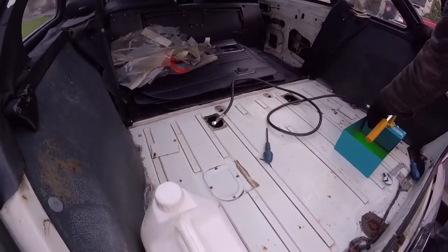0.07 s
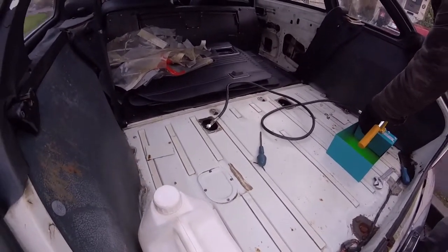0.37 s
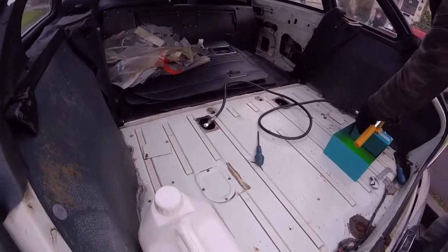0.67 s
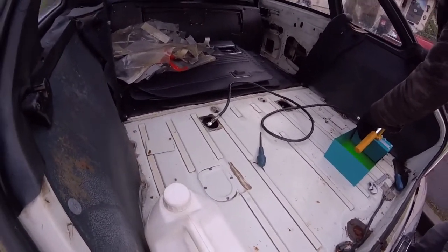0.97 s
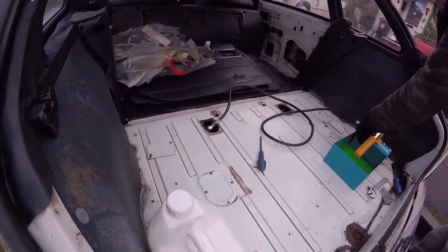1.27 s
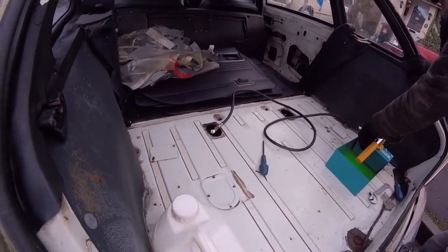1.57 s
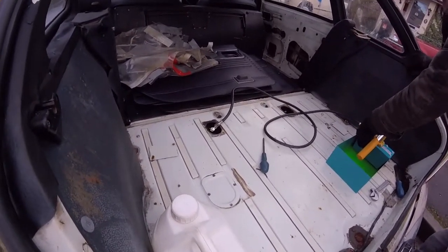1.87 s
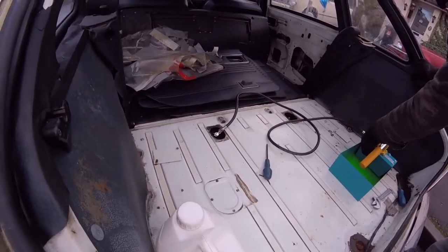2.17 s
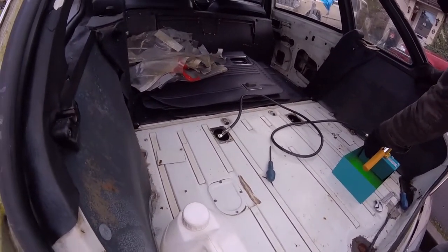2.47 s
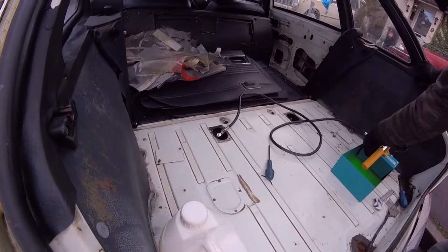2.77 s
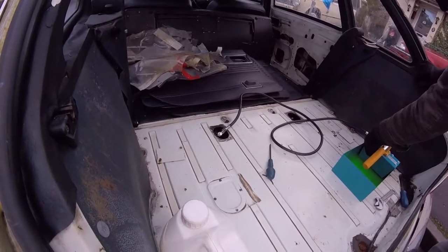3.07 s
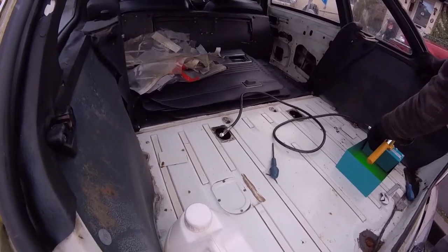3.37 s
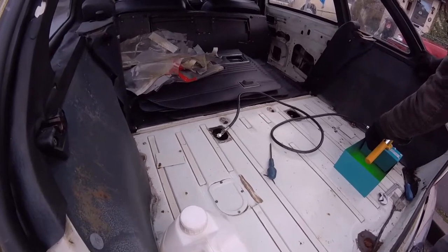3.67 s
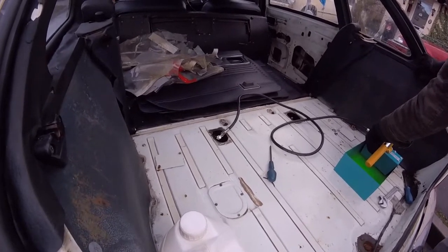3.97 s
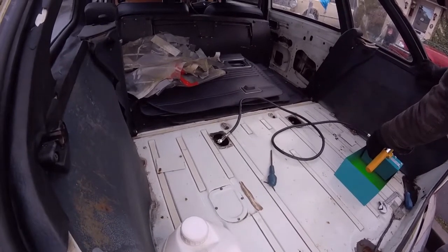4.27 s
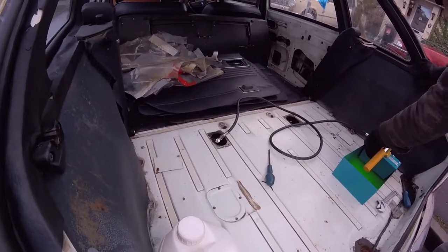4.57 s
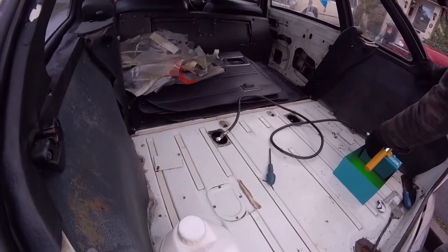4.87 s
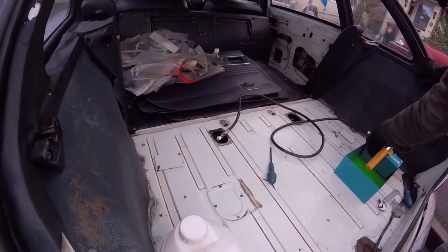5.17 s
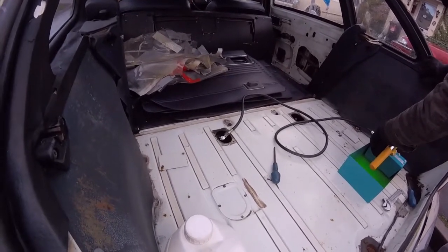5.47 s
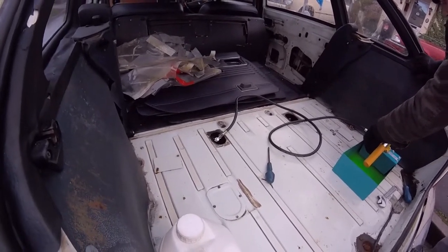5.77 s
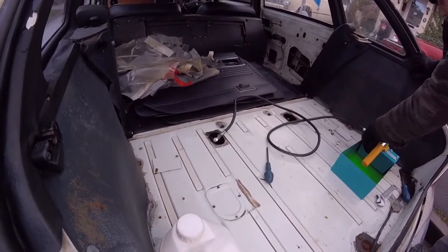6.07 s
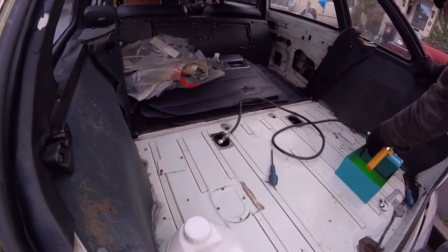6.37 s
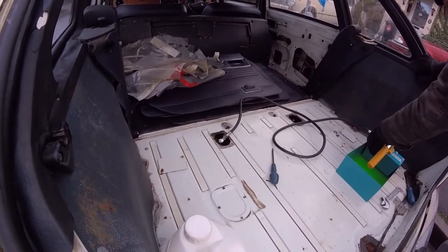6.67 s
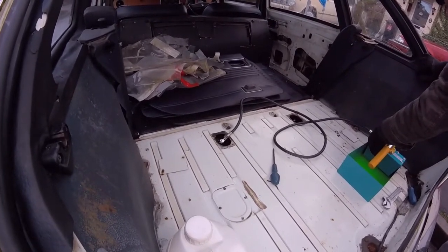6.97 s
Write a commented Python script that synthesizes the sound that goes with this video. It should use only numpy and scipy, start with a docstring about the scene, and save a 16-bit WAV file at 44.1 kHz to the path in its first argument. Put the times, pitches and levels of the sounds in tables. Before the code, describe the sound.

A hand pump knocks on a car's steel boot floor and hisses out sputtering spray, then the body thumps, amid birds, traffic and breeze.

```python
"""At a car's open boot, one microphone; distant traffic, small birds and a rumbling breeze throughout.
At 0.4 s a hand pump knocks on the bare steel floor, its valve opens and a jet of spray hisses out.
As the pressure falls the jet breaks into spurts, then last sputters, and runs dry at about 2 s.
From 3.5 s a finch trills across the yard; at 4.1 s the car's body thumps once and its panels boom.
The birds chirp and churr on to the end, between gusts on the microphone."""
import sys
import numpy as np
from scipy import signal
from scipy.fft import rfft, irfft
from scipy.io import wavfile
from scipy.ndimage import uniform_filter1d

SR = 44100
rng = np.random.default_rng(int(sys.argv[2]) if len(sys.argv) > 2 else 0)


def log_audio(samples):
    """Write samples as a 16-bit WAV file to the path given in sys.argv[1]."""
    # one column per channel
    frames = np.atleast_2d(samples).T
    # limit to full scale, then quantise
    limited = np.clip(frames, -1, 1)
    pcm = np.round(limited * 32767).astype(np.int16)
    wavfile.write(sys.argv[1], SR, pcm)


N = 309749

# Levels in the tables are relative: each source is scaled further on its way to the microphone.
# spectrum of distant traffic: frequency_hz, density_db
TRAFFIC_COLOUR = [(50, -3.5), (90, 11), (130, 3.5), (250, -0.5), (450, -5.5), (650, -1), (900, 2.5),
                  (1100, 1), (1450, -5), (1850, -19.5), (2400, -23), (3600, -25.5), (6500, -34),
                  (12500, -45), (14500, -69)]
# spectrum of the breeze on the microphone: frequency_hz, density_db
BREEZE_COLOUR = [(8, -0.5), (25, 3.5), (45, -3), (90, -12.5), (150, -22), (250, -40.5), (500, -48),
                 (1500, -101)]
# gusts on the microphone: peak_s, half_length_s, level_db
GUSTS = [(0.105, 0.041, -32.5), (0.3, 0.13, -29.5), (0.58, 0.11, -33.5), (1.287, 0.053, -32.5),
         (2.195, 0.16, -44), (3.11, 0.081, -35.5), (3.27, 0.11, -42), (3.797, 0.25, -40),
         (4.527, 0.12, -34), (4.916, 0.042, -34), (5.325, 0.12, -37), (6.607, 0.049, -30),
         (6.814, 0.086, -35.5)]

# warbles of far birds: start_s, length_s, pitch_hz, wander_share, level_db
FAR_WARBLES = [(2.139, 0.18, 4110, 0.13, -64), (2.77, 0.14, 3560, 0.055, -64.5),
               (3.138, 0.04, 3350, 0.046, -60.5), (3.44, 0.06, 3340, 0.045, -62),
               (5.038, 0.091, 4190, 0.09, -64.5), (5.447, 0.59, 3910, 0.1, -68)]
# birds' dry churrs: start_s, length_s, sweeps_per_s, final_db
CHURRS = [(2.446, 0.07, 66, -56), (3.141, 0.25, 66, -53), (5.259, 0.054, 81, -50), (6.833, 0.072, 80, -50),
          (6.972, 0.044, 78, -48.5)]
# near birds' chirps, two followed by a quick echo:
# start_s, length_s, start_hz, middle_hz, end_hz, level_db
NEAR_CHIRPS = [(0.002, 0.022, 4000, 4630, 5150, -50.5), (0.333, 0.027, 5880, 6000, 5980, -54),
               (0.738, 0.059, 4300, 3880, 3750, -55.5), (1.11, 0.03, 4930, 5200, 5350, -56.5),
               (1.814, 0.024, 3900, 4280, 3950, -53), (1.843, 0.014, 3850, 4260, 4100, -52),
               (1.866, 0.022, 3380, 3750, 4000, -55.5), (1.884, 0.021, 3500, 3220, 3180, -56.5),
               (2.026, 0.013, 3600, 4100, 4500, -61), (2.114, 0.11, 3050, 3080, 2850, -60),
               (2.137, 0.04, 4300, 5020, 4730, -66), (2.181, 0.016, 4620, 4110, 3950, -53),
               (2.186, 0.012, 3400, 2950, 2700, -53.5), (2.187, 0.042, 6400, 6440, 6630, -67.5),
               (2.211, 0.022, 3570, 4030, 4630, -64), (2.231, 0.01, 4500, 3880, 3550, -60),
               (2.242, 0.026, 3700, 4770, 5050, -63), (2.937, 0.03, 4170, 5330, 5640, -56.5),
               (3.053, 0.033, 3450, 3980, 4380, -59), (3.102, 0.012, 4220, 3930, 3920, -55),
               (3.397, 0.023, 4170, 3940, 3950, -57.5), (4.274, 0.013, 4270, 5130, 5800, -57),
               (4.539, 0.02, 4770, 5290, 5600, -51.5), (4.638, 0.022, 4100, 4400, 4760, -54),
               (4.922, 0.042, 5550, 5920, 5690, -54.5), (5.036, 0.012, 3900, 4600, 5000, -55.5),
               (5.346, 0.027, 3700, 4500, 5100, -50.5), (5.37, 0.023, 3750, 4540, 5000, -52.5),
               (5.471, 0.027, 3360, 3790, 4080, -51.5), (5.522, 0.019, 5200, 5760, 5900, -58.5),
               (5.522, 0.02, 6000, 6750, 7050, -61), (5.566, 0.0226, 3800, 4620, 5100, -48),
               (5.592, 0.024, 3830, 4450, 4800, -56), (5.712, 0.025, 3300, 3680, 4050, -50.5),
               (5.758, 0.022, 5200, 5630, 5800, -60), (5.845, 0.062, 4950, 4810, 4620, -51),
               (5.898, 0.03, 4500, 3930, 3360, -61), (5.925, 0.013, 3430, 4160, 4900, -55),
               (5.965, 0.058, 3460, 4030, 4940, -51), (6.077, 0.014, 5730, 6500, 6950, -65),
               (6.104, 0.028, 6150, 6480, 6460, -56.5), (6.168, 0.012, 3200, 3730, 4050, -52),
               (6.217, 0.0081, 4800, 5400, 6000, -63), (6.251, 0.14, 4020, 3610, 3657, -54),
               (6.592, 0.018, 3850, 4100, 4300, -59), (6.633, 0.0224, 4750, 5400, 5800, -51.5),
               (6.732, 0.026, 3970, 4520, 4780, -55)]
# a finch's syllable, four glides and then a short low echo of the last:
# offset_s, length_s, start_hz, end_hz, bend_exponent, level_db
FINCH_SYLLABLE = [(0.0, 0.018, 8800, 7350, 1.2, -15.5), (0.025, 0.029, 7100, 5900, 1.5, -7.5),
                  (0.053, 0.015, 4540, 5154, 0.88, -0.5), (0.067, 0.019, 6500, 3400, 4.5, 0),
                  (0.087, 0.014, 4010, 3170, 1.25, -1)]
# path of the finch's closing slur: time_s, pitch_hz, level_db
SLUR_PATH = [(4.286, 5020, -50), (4.32, 4160, -51), (4.36, 3690, -56.5), (4.405, 3530, -53.5),
             (4.43, 3500, -60)]
# echoes off nearby walls: delay_s, level_db
WALL_ECHOES = [(0.008, -11.5), (0.019, -14), (0.042, -13.5), (0.061, -21)]

# the body's thump and its soft settlings: start_s, ring_db, boom_db, cutoff_hz
THUMPS = [(4.131, -25, -20.5, 3600), (4.16, -37, -36, 400), (4.259, -41, -29.5, 252), (5.28, -43, -50, 200)]
# modes of the car's large panels: pitch_hz, level_db, t60_s
BODY_MODES = [(42.6, 0.5, 0.79), (70.8, -11, 0.47), (107.8, -3, 0.38), (149.3, 3, 0.45), (282.2, -7, 0.47),
              (470, -34, 0.47)]
# dense boom of those panels: frequency_hz, density_db, t60_s
BODY_BOOM = [(25, 9, 0.84), (131, -2.5, 1.77), (282, -8, 0.62), (420, -18.5, 0.34), (756, -25, 0.044),
             (1290, -4.5, 0.036), (1830, -24, 0.071), (3600, -30.5, 0.044), (6000, -36, .03),
             (14000, -50, .03)]

# the pump's base scuffing under the hand: start_s, hold_s, level_db
SCUFFS = [(0.365, 0.01, -42), (0.514, 0.03, -42), (1.03, 0.22, -54), (1.718, 0.045, -45),
          (3.097, 0.67, -57)]
# rustle of the floor pan: frequency_hz, density_db
SCUFF_COLOUR = [(120, -22), (250, -11), (320, 9.5), (400, 3.5), (490, -15), (750, -7), (1200, -7),
                (1500, -9), (2000, -43), (6000, -80)]
# soft bumps of the opening valve: start_s, level_db
VALVE_BUMPS = [(0.491, -25.5), (0.546, -33)]
# modes of the pump's housing: pitch_hz, level_db, t60_s
HOUSING_MODES = [(171, -5, 0.12), (344, -1, 0.084), (388, -5, 0.14), (697, -7.5, 0.08), (835, -12, 0.08)]
# knocks of the pump on the floor: start_s, ring_db, clatter_db, cutoff_hz
KNOCKS = [(0.356, -36, -25.5, 1300), (0.368, -23.5, -29.5, 6000), (0.379, -36.5, -26, 2000),
          (0.405, -43, -35, 350), (0.42, -41, -35, 199), (1.745, -51, -50, 1500), (1.777, -61, -47, 2500)]
# modes of the steel floor: pitch_hz, level_db, t60_s
FLOOR_MODES = [(88.7, -7.5, 0.33), (183, -4, 0.22), (278.6, 0.5, 0.12), (342, -0.5, 0.068),
               (399.5, -5, 0.16), (645, -4.5, 0.11), (813, -12, 0.1), (1146, -6, 0.17), (1390, -18, 0.16),
               (1462, -10, 0.1)]
# dense rattle of that floor: frequency_hz, density_db, t60_s
FLOOR_CLATTER = [(30, 17, 0.068), (120, 3.5, 0.13), (336, -7.5, 0.21), (520, -13, 0.14), (1200, -7.5, 0.1),
                 (1600, -20, 0.11), (1970, -36, 0.095), (2600, -17, 0.047), (5000, -40, .06),
                 (14000, -40, .05)]

# hiss of the unbroken jet: frequency_hz, density_db
JET_COLOUR = [(900, -26), (1800, -6), (2400, -3), (3400, 4), (4200, -0.5), (5000, -2.5), (6400, -4),
              (8100, -2.5), (9500, -6.5), (12500, -10.5), (14500, -6.5)]
# ringing of the nozzle in the jet: centre_hz, width_hz, lift_db
NOZZLE_RESONANCES = [(2120, 80, 10), (2390, 100, 4), (2820, 160, 10), (3420, 380, 8), (6370, 220, 6),
                     (7900, 200, 4), (8500, 120, 5)]
# runs of valve chatter as the pressure falls: start_s, length_s, spurts_per_s, level_db
CHATTER_RUNS = [(0.704, 0.055, 31, -56), (0.777, 0.07, 33, -53), (0.877, 0.1, 36, -52.5),
                (0.989, 0.03, 57, -54), (1.032, 0.14, 39, -55), (1.19, 0.1, 36, -56.5)]
# last sputters, singing in the nozzle at low pressure: start_s, hiss_db, lisp_db
SPUTTERS = [(1.311, -57.5, -72), (1.345, -58, -70), (1.383, -55.5, -66), (1.43, -59, -58), (1.47, -61, -61),
            (1.53, -57.5, -57), (1.576, -61, -51), (1.615, -55, -70), (1.65, -57.5, -63),
            (1.69, -58.5, -77), (1.746, -61, -72), (1.773, -62, -64), (1.822, -66, -67), (1.869, -62, -58),
            (1.931, -63, -72)]
# hiss of the spurts: frequency_hz, density_db
SPURT_COLOUR = [(1500, -6), (2500, -3), (3250, 3.5), (4200, -2), (6200, -3), (7300, -2.5), (7950, 2.5),
                (9000, -5), (10400, -3.5), (11200, -1), (12300, -10), (14600, -10.5)]
# the nozzle's lisp: frequency_hz, density_db
LISP_COLOUR = [(4500, -11), (5900, -5), (6600, 2), (7400, -9), (8500, -12), (10000, -40)]


def amp(db):
    """Decibels to gain."""
    return 10 ** (np.asarray(db) / 20)


def unit(x):
    """Scales to rms 1."""
    return x / np.sqrt(np.mean(x ** 2) + 1e-20)


def drift(samples, span):
    """Random wobble of rms 1, smoothed over span samples."""
    return unit(uniform_filter1d(rng.standard_normal(samples), span))


def over_hz(table, hz, column=1):
    """Reads a column of a table on a log-frequency axis, one row a frequency."""
    columns = np.transpose(table)
    return np.interp(np.log(hz + 1), np.log(columns[0] + 1), columns[column])[:, None]


def add(mix, start_s, sound):
    """Mixes a sound in at start_s."""
    part = mix[max(round(start_s * SR), 0):][:len(sound)]
    part += sound[:len(part)]


def envelope(start_s, rise_s, hold_s, fall_db_per_s):
    """Gain over the whole scene: a straight rise, a hold, then a steady fall in dB."""
    age = np.arange(N) / SR - start_s
    return np.clip(age / rise_s, 0, 1) * amp(-fall_db_per_s * np.maximum(age - rise_s - hold_s, 0))


def noise(colour, patchy_db):
    """Noise of a given spectrum whose level drifts in small patches of time and frequency."""
    hz = np.fft.rfftfreq(2048, 1 / SR)
    real, imag, patches = rng.standard_normal((N // 512 + 5, len(hz), 3)).T
    patches = unit(uniform_filter1d(uniform_filter1d(patches, 14, axis=0), 8, axis=1))
    spectrum = (real + 1j * imag) * amp(over_hz(colour, hz) + patchy_db * patches)
    return unit(signal.istft(spectrum, nperseg=2048, noverlap=1536)[1][:N])


def reflect(dry, delay_s, t60_s, wet_db, count):
    """Adds scattered reflections that die away after a first delay."""
    t = np.arange(SR // 2) / SR
    taps = np.zeros(len(t))
    arrivals = ((np.arange(count) + rng.random(count)) * len(t) / count).astype(int)
    taps[arrivals] = rng.choice([-1, 1], count) * amp(-60 * t[arrivals] / t60_s)
    out = dry.copy()
    add(out, delay_s, amp(wet_db) * signal.fftconvolve(dry, taps / np.linalg.norm(taps)))
    return out


def traffic(level_db=-42.5):
    """Steady tyre roar from far roads."""
    return amp(level_db) * noise(TRAFFIC_COLOUR, patchy_db=0.91)


def breeze(calm_db=-44.5):
    """Wind rumbles on the microphone; each gust adds its power to the calm."""
    t = np.arange(N) / SR
    gust_power = sum(amp(db) ** 2 * np.exp(-((t - peak_s) / half_s) ** 2) for peak_s, half_s, db in GUSTS)
    return np.sqrt(amp(calm_db) ** 2 + gust_power) * noise(BREEZE_COLOUR, patchy_db=0.5)


def whistle(hz, db, waver_share=0.012, crest=1.16):
    """A bird's nearly pure, wavering tone that swells and fades; a crest above 1 peaks late."""
    wavering_hz = hz * (1 + waver_share * drift(SR, 60)[:len(hz)])
    swell = np.sin(np.pi * np.linspace(0, 1, len(hz)) ** crest)
    return 1.73 * amp(db) * swell * np.sin(2 * np.pi * np.cumsum(wavering_hz) / SR)


def far_twitter(flutter_db=4):
    """Far birds' quick warbles, wandering in pitch and level, blurred by distance."""
    out = np.zeros(N)
    for start_s, length_s, hz, wander, db in FAR_WARBLES:
        turns = uniform_filter1d(uniform_filter1d(rng.standard_normal((2, SR)), 400), 200)
        bend, flutter = unit(turns)[:, :round(length_s * SR)]
        add(out, start_s, whistle(hz * np.exp(wander * bend), db + flutter_db * flutter))
    return amp(-4.5) * reflect(out, delay_s=0.0033, t60_s=0.066, wet_db=-0.5, count=1500)


def churrs(low_hz=3050, high_hz=6800, sweep_s=0.0045, swell_db=8, scatter_s=0.013):
    """Birds' trains of quick upward sweeps grow louder, each sweep scattered into a rasp."""
    out, tail = np.zeros(N), np.arange(SR // 25) / SR
    sweep_hz = np.geomspace(low_hz, high_hz, int(np.ceil(sweep_s * SR)))
    for start_s, length_s, rate, final_db in CHURRS:
        for age in np.arange(0, length_s, 1 / rate):
            loud, sharp = rng.standard_normal(2)
            db = final_db + loud - swell_db * (1 - age / length_s)
            sweep = whistle(sweep_hz * (1 + 0.04 * sharp), db)
            scatter = rng.standard_normal(len(tail)) * np.exp(-tail / scatter_s)
            rasp = amp(2.5) * signal.fftconvolve(sweep, scatter / np.linalg.norm(scatter))
            add(out, start_s + age, sweep)
            add(out, start_s + age, rasp)
    return amp(-4.3) * out


def closing_slur(buzz_hz=94.2, depth_share=0.079):
    """The finch's falling last note; a fast vibrato makes it buzz."""
    times, hz, db = np.transpose(SLUR_PATH)
    t = np.arange(times[0], times[-1], 1 / SR)
    vibrato = 1 + depth_share * np.sin(2 * np.pi * buzz_hz * t)
    return whistle(np.interp(t, times, hz) * vibrato, np.interp(t, times, db))


def finch(start_s=3.466, period_s=0.1603, syllables=5, growth_db=1.46, uneven_db=1.3):
    """A trill of ever louder syllables, no two quite alike, then a slur, echoing across the yard."""
    out = np.zeros(N)
    for k in range(syllables):
        syllable_s, syllable_db = start_s + k * period_s, -55.5 + k * growth_db
        for offset_s, length_s, start_hz, end_hz, bend, db in FINCH_SYLLABLE:
            loud, sharp, late, stretch = rng.standard_normal(4)
            length_s *= np.exp(0.06 * stretch)
            t = np.arange(0, length_s, 1 / SR)
            glide_hz = end_hz + (start_hz - end_hz) * abs(1 - t / length_s) ** bend
            note_db = syllable_db + db + uneven_db * loud
            note = whistle(glide_hz * (1 + 0.018 * sharp), note_db, waver_share=0.025, crest=1.0)
            add(out, syllable_s + offset_s + 0.001 * late, note)
    add(out, SLUR_PATH[0][0], closing_slur())
    return amp(-1) * reflect(out, delay_s=0.01, t60_s=0.35, wet_db=-6, count=1000)


def near_chirps():
    """Near birds' chirps and two quick echoes, each bending through a start, middle and end pitch."""
    out = np.zeros(N)
    for start_s, length_s, *pitches, db in NEAR_CHIRPS:
        progress = np.arange(0, length_s, 1 / SR) / length_s
        parabola = np.polyfit([0, 0.5, 1], pitches, 2)
        add(out, start_s, whistle(np.polyval(parabola, progress), db))
    return out


def yard_birds():
    """Chirps, twitter and finch reach the microphone directly and off nearby walls."""
    song = near_chirps() + far_twitter() + finch()
    heard = song.copy()
    for delay_s, db in WALL_ECHOES:
        add(heard, delay_s, amp(db) * song)
    return amp(-1.1) * reflect(heard, delay_s=0.002, t60_s=0.24, wet_db=-10, count=1000)


def panel_blows(blows, modes, wash, rise_s):
    """Each blow rings a panel's main modes and a dense wash of small ones, treble dying first."""
    t, out = np.arange(SR) / SR, np.zeros(N)
    ring = sum((-1) ** k * amp(db - 60 * t / t60_s) * np.sin(2 * np.pi * hz * t)
               for k, (hz, db, t60_s) in enumerate(modes))
    for start_s, ring_db, wash_db, cutoff_hz in blows:
        hz, age, spectrum = signal.stft(rng.standard_normal(SR), SR, nperseg=512, noverlap=384)
        spectrum *= amp(over_hz(wash, hz) - 60 * age / over_hz(wash, hz, column=2))
        dense = signal.istft(spectrum, SR, nperseg=512, noverlap=384)[1][:SR]
        dense /= np.sqrt(np.sum(dense ** 2) / (SR // 25))  # the energy of 40 ms at rms 1
        blow = (amp(ring_db) * ring + amp(wash_db) * dense) * (1 - np.exp(-t / rise_s))
        # a soft contact cannot excite the treble
        add(out, start_s, signal.lfilter(*signal.butter(2, cutoff_hz, fs=SR), blow))
    return out


def body_thump():
    """The car's large panels boom once, then settle softly."""
    return panel_blows(THUMPS, BODY_MODES, BODY_BOOM, rise_s=0.00014)


def base_scuffs(slips_per_s=500):
    """Tiny slips of the pump's base rustle the floor pan."""
    slips = rng.exponential(1, N) * (rng.random(N) < slips_per_s / SR)
    friction = unit(uniform_filter1d(uniform_filter1d(slips, 250), 40))
    push = sum(amp(db) * envelope(start_s, 0.015, hold_s, fall_db_per_s=84)
               for start_s, hold_s, db in SCUFFS)
    return push * friction * noise(SCUFF_COLOUR, patchy_db=1.5)


def valve_bumps(rise_s=0.0016):
    """The valve's kick rings the pump's hollow housing."""
    t, out = np.arange(SR // 4) / SR, np.zeros(N)
    ring = sum(amp(db - 60 * t / t60_s) * np.sin(2 * np.pi * hz * t) for hz, db, t60_s in HOUSING_MODES)
    for start_s, db in VALVE_BUMPS:
        add(out, start_s, amp(db) * ring * (1 - np.exp(-t / rise_s)))
    return out


def pump_knocks():
    """The pump strikes the boot's bare steel floor, which rings and clatters."""
    return panel_blows(KNOCKS, FLOOR_MODES, FLOOR_CLATTER, rise_s=0.0012)


def jet_flow(leak_s=0.33, open_s=0.4846, rise_s=0.0093, dry_s=1.95, shut_db_per_s=55):
    """The strongest of an early leak, the opening valve's burst and a dribble, until the pump runs dry."""
    leak = amp(-55.5) * envelope(leak_s, 0.087, open_s - leak_s, shut_db_per_s)
    burst = amp(-42) * envelope(open_s, rise_s, hold_s=0.017, fall_db_per_s=52)
    dribble = amp(-54) * envelope(open_s, rise_s, hold_s=0, fall_db_per_s=13)
    return np.max([leak, burst, dribble], axis=0) * envelope(0, rise_s, dry_s, shut_db_per_s)


def nozzle_ring(hiss):
    """The nozzle lifts the hiss around each of its resonances."""
    hz = np.fft.rfftfreq(N, 1 / SR)
    lift = 1 + sum((amp(db) - 1) / (1 + (2 * (hz - centre_hz) / width_hz) ** 2)
                   for centre_hz, width_hz, db in NOZZLE_RESONANCES)
    return unit(irfft(rfft(hiss) * lift, N))


def valve_spurts(rise_s=0.0071, hold_s=0.01, fall_s=0.011, uneven_db=2.0):
    """Gains of hiss and lisp: the valve chatters, one spurt a cycle, then gives separate sputters."""
    t, opening, lisp = np.arange(SR // 10) / SR, np.zeros(N), np.zeros(N)
    spurt = np.minimum(t / rise_s, 1) * np.exp(-np.maximum(t - hold_s, 0) / fall_s)
    for start_s, length_s, rate, db in CHATTER_RUNS:
        for age, loud in zip(np.arange(0, length_s, 1 / rate), rng.standard_normal(SR // 100)):
            add(opening, start_s + age, amp(db + uneven_db * loud) * spurt)
    for start_s, hiss_db, lisp_db in SPUTTERS:
        add(opening, start_s, amp(hiss_db) * spurt)
        add(lisp, start_s, amp(lisp_db) * spurt)
    return opening, lisp


def spray(grain_db=2.0, surge_db=1.6, singing_db=-52):
    """A jet hisses and breaks into spurts, both grainy with droplets and coloured by the bare cabin."""
    opening, lisp = valve_spurts()
    droplets = unit(amp(grain_db * drift(N, 30)))
    flow = amp(surge_db * drift(N, 700)) * jet_flow()
    hiss = noise(JET_COLOUR, patchy_db=3.5)
    singing = flow / (flow + amp(singing_db))  # only a strong flow makes the nozzle ring
    jet = flow * (singing * nozzle_ring(hiss) + (1 - singing) * hiss)
    spurts = opening * noise(SPURT_COLOUR, patchy_db=2.0) + lisp * noise(LISP_COLOUR, patchy_db=5.5)
    direct = droplets * (jet + spurts)
    return amp(-0.33) * reflect(direct, delay_s=0.0006, t60_s=0.05, wet_db=-7, count=1500)


def scene():
    """In mono: pump and car in front, birds in the yard, roads far off, wind on the microphone."""
    at_boot = pump_knocks() + body_thump() + valve_bumps() + base_scuffs() + spray()
    outdoors = yard_birds() + churrs() + traffic() + breeze()
    return (at_boot + outdoors)[None]


def record(dry, edge_hz=15000):
    """The recorder's band limit."""
    lowpass = signal.firwin(511, edge_hz, window=("kaiser", 9), fs=SR)
    return signal.oaconvolve(dry, lowpass[None], "same")


dry = scene()
out = record(dry)
log_audio(out)
```